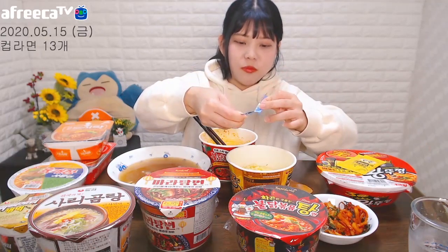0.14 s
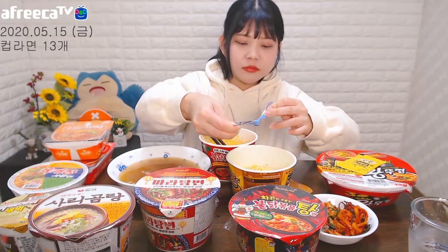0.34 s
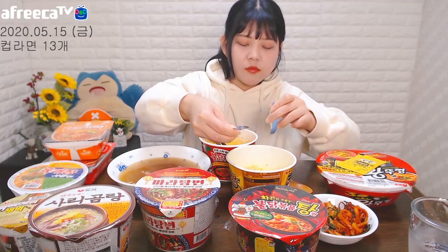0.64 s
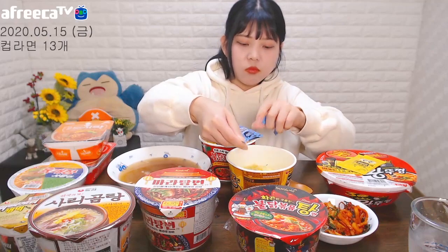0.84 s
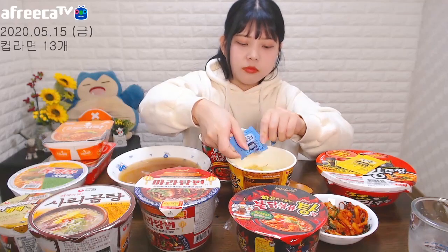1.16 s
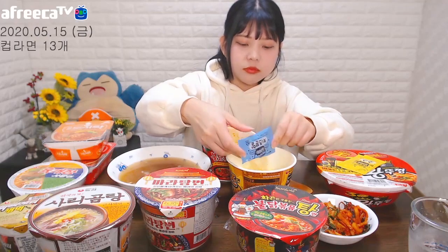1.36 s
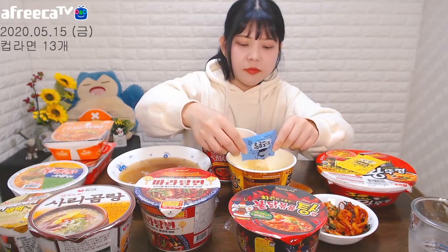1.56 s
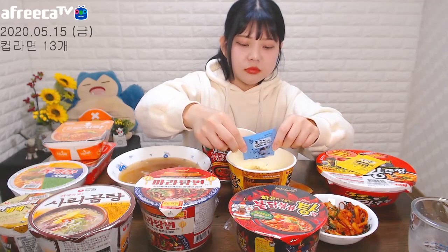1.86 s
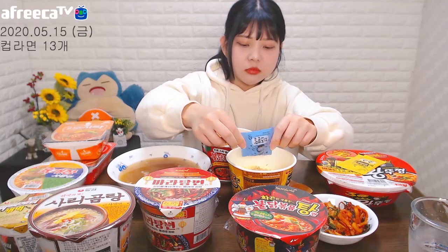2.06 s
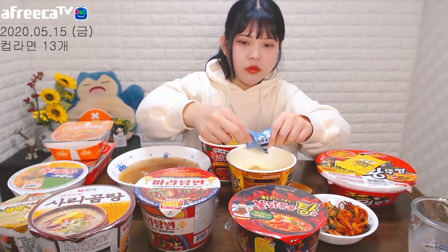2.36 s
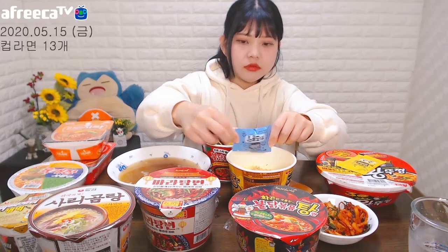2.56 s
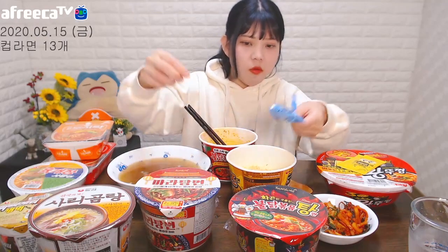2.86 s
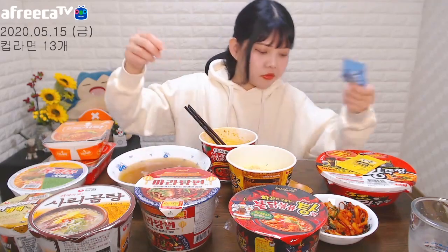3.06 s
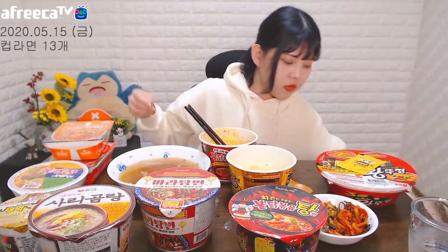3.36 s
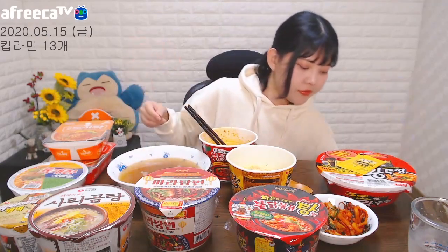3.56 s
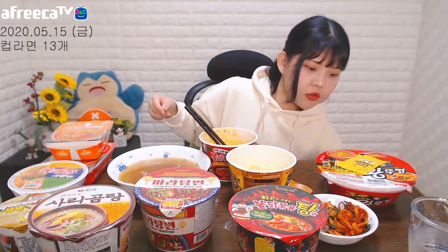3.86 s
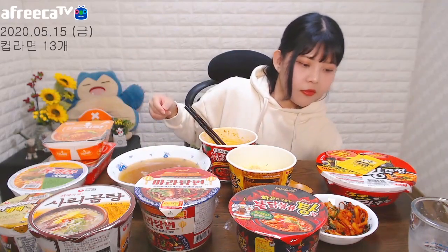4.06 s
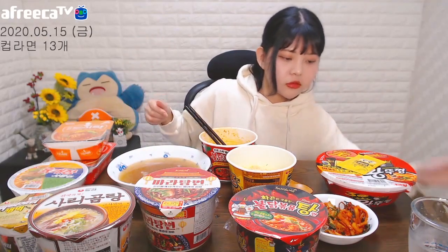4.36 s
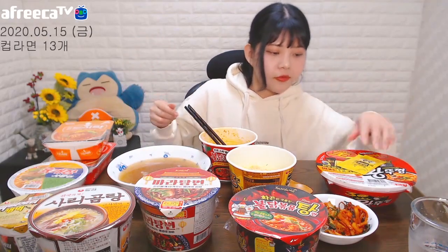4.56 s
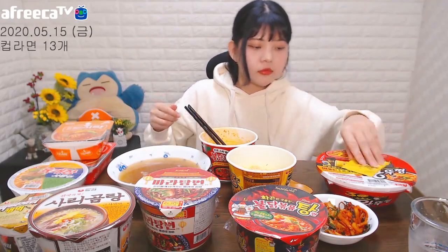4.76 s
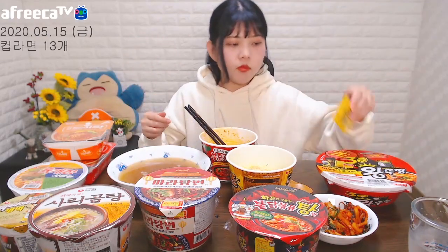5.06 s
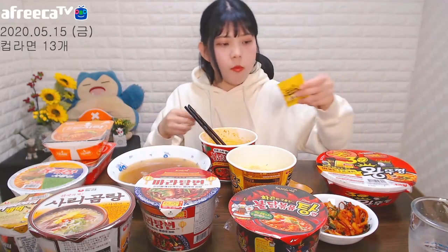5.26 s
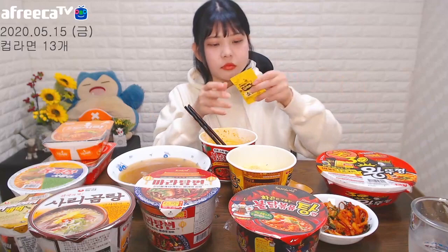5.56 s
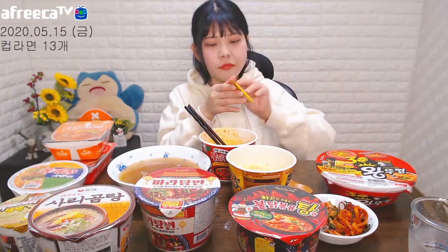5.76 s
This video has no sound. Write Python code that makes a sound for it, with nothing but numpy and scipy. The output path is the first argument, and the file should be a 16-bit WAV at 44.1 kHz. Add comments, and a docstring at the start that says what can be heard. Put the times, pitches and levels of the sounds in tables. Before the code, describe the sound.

Crisp thin film snaps and crackles near the microphone, with a slight hollow colour from an open cup and a short small-room tail. Sparse creases grow into a rapid loud flurry, then drop away. Afterwards come isolated light contacts, muffled table rumbles, near silence with very faint hum, and one small crinkle at the end.

```python
"""Thin plastic crackles and snaps: a sachet is pinched, crinkled and torn open over a paper cup at a table,
dropped aside, and another is picked off a lid. Creases are short damped rings over a dense crackle of grains.
The cup adds resonances, a small room answers with noise tails, the table rumbles in filtered noise,
and a mains hum and a late thin whine lie below. A close stereo microphone feeds a noise suppressor
that ducks the quiet moments."""
import sys
import numpy as np
from scipy import signal
from scipy.fft import rfft, irfft, next_fast_len
from scipy.io import wavfile
from scipy.ndimage import uniform_filter1d, map_coordinates

SR = 44100
rng = np.random.default_rng(int(sys.argv[2]) if len(sys.argv) > 2 else 0)


def unload_audio(sound):
    """Save the sound as a 16-bit wav file, at the path given as the first command line argument."""
    columns = np.transpose(np.atleast_2d(sound))
    # keep every value between -1 and 1, then stretch to whole-number steps
    steps = np.round(np.clip(columns, -1, 1) * 32767)
    wavfile.write(sys.argv[1], SR, steps.astype(np.int16))


def to_linear_factor(level_db):
    """Convert decibel levels (scalar or array-like) to linear amplitude factors."""
    exponent = np.asarray(level_db, float) / 20
    return 10 ** exponent


N = 260659

# Single creases and contacts. Each row: start in seconds, level in dB, ring pitch in Hz,
# thud trim in dB re level, sizzle trim in dB re level.
SNAPS = [(0.013, -53, 5640, -18, 6), (0.045, -45.5, 5230, -18, 2), (0.051, -48, 4300, -10, -0.5),
         (0.1135, -41, 6240, -5, -5.5), (0.1205, -54, 4370, -7, -4), (0.253, -34.5, 2020, -13.5, 1.5),
         (0.4555, -38.5, 2267, -8, 0), (0.5184, -44.5, 1496, -38, -31), (0.7193, -48.5, 1660, -22, 2.5),
         (0.9362, -46, 3300, -1, -15.5), (0.962, -39.5, 2220, 0.5, 0), (0.9868, -40, 5070, -19.5, -16.5),
         (1.011, -45, 4498, -24, -3.5), (1.034, -51, 2230, 2, 3), (1.097, -37.5, 2130, -6, -16.5),
         (1.225, -50.5, 1820, -6.5, -21), (1.3326, -48, 1600, -8.5, -19.5),
         (1.3743, -43.5, 2055, -19.5, -20), (1.4065, -42.5, 2150, -27, -9.5),
         (1.479, -45, 2540, -3.5, -4.5), (1.5089, -33, 2940, -9.5, -2.5), (1.519, -25.5, 2850, -19, -9.5),
         (1.5439, -35.5, 2740, -19, -30), (1.5752, -33, 2200, -2.5, -4.5), (1.6141, -41.5, 1848, 1, -30),
         (1.695, -41.5, 4400, -21, -3.5), (1.7016, -26, 2600, -7.5, -7.5), (1.7464, -42, 1800, -13.5, -3.5),
         (1.7629, -35, 1700, -8, -5), (1.776, -38, 1784, 1.5, -17), (1.8033, -34.5, 2330, -3, -0.5),
         (1.856, -25, 2200, -11.5, -20.5), (1.9034, -35.5, 2210, -9.5, -6),
         (1.9415, -35.5, 2140, -6.5, -10), (2.0314, -37, 2130, 0, -23), (2.051, -34.5, 2130, -7, -20.5),
         (2.083, -44, 2220, -13, -28.5), (2.1128, -33, 1870, -6, -14), (2.1207, -20.5, 1948, -14.5, -15),
         (2.145, -28.5, 2370, 0.5, -8), (2.1604, -27, 2400, -8.5, -6.5), (2.1662, -29.5, 3460, -13.5, -6.5),
         (2.2039, -31.5, 2181, -5.5, -16), (2.2258, -30.5, 2230, -13, -2.5),
         (2.2551, -19.5, 2295, -18.5, -4), (2.284, -25, 2130, -5, -5.5), (2.303, -35, 2320, -7, -3),
         (2.3092, -27, 4100, -17, -2.5), (2.3263, -24.5, 2116, -5, -4.5), (2.338, -35.5, 1520, 5.5, -17.5),
         (2.3428, -21.5, 2537, -8, -6), (2.3555, -27, 2180, -11, -4.5), (2.389, -35.5, 5699, -8, -6.5),
         (2.4045, -24.5, 2380, -8.5, -2.5), (2.4136, -33.5, 2170, -4.5, -2),
         (2.426, -22, 2770, -9.5, -10.5), (2.438, -20, 2217, -8.5, -1.5), (2.446, -26.5, 2290, -10, 0),
         (2.4723, -27, 2720, -8.5, -4.5), (2.4888, -30, 4810, -10, -3), (2.5022, -30.5, 2110, -4, -19),
         (2.5449, -34.5, 2884, -5, -14), (2.5817, -29.5, 1900, -23, -0.5), (2.607, -32, 4790, -21.5, -2),
         (2.745, -48.5, 1445, 3, -29), (2.7985, -44, 4116, -21, -49), (2.8092, -48, 1675, 3, -20),
         (3.0627, -34, 1837, -24.5, -33), (3.067, -33, 2198, -29.5, -25.5), (3.462, -40, 1594, -5, -31),
         (3.5026, -46, 2440, 1.5, -13), (3.7, -50, 1888, -8, -11), (3.71, -41, 1998, -22, -42),
         (3.899, -52.5, 1734, -9.5, -20), (4.6115, -45.5, 1430, 11, -20.5), (4.618, -49, 3450, -18, -21),
         (4.7195, -51, 1611, 10.5, -27.5), (4.741, -47.5, 1535, 6.5, -17), (4.7605, -56, 1570, 13, -22),
         (4.762, -46.5, 4075, -9, -17), (4.81, -56.5, 2320, 2, -30), (4.9569, -57.5, 2294, 4.5, -5),
         (5.0966, -57.5, 3220, -26, -25), (5.0937, -57.5, 5870, -16.5, -8.5), (5.1567, -63, 2033, 7, -29),
         (5.691, -65, 3760, 18, -23), (5.769, -60, 2200, -24, -10), (5.8108, -37.5, 2198, 2.5, -6.5)]
# Spectrum of the sizzle. Each row: frequency in Hz, relative density in dB per Hz.
SIZZLE = [(2500, -29.5), (3700, -6), (4700, 0), (6300, -2), (9000, -12)]
# Where the hands are. Each row: time in seconds, left over right in dB.
HANDS = [(0, 1), (1.4, -2), (2.3, -2), (3.1, -3.5), (3.5, 0), (4.3, 2), (4.7, -3), (5.91, -0.5)]
CRACK_DB = -13  # re snap level, over the cup


def snaps():
    """Each crease rings briefly at its own pitch, with a crack, a thud and a sizzle; softer, longer off the cup."""
    out, sizzle = np.zeros((2, 2, N + SR // 10))
    t = np.arange(SR // 14) / SR
    (fold_hz,), (pan_db,), away = curves(FOLD_PITCH), curves(HANDS), 1 - over_cup()
    for start_s, db, hz, thud_db, sizzle_db in SNAPS:
        start = round(start_s * SR)
        span = slice(start, start + len(t))
        noise, *side_noise = rng.standard_normal((3, len(t)))
        ring_detune, thud_detune = rng.normal(1, [[[.08]], [[.17]]], size=(2, 5, 1))
        chime_hz, chime_turn = rng.uniform(3300, 7300, (4, 1)), rng.random((4, 1))
        chimes = 0.23 * np.sin(2 * np.pi * (chime_hz * t + chime_turn)).sum(axis=0)
        pan = pan_db[start] + 1.4 * rng.standard_normal()
        sides = to_linear_factor(db + np.array([[.5], [-.5]]) * pan)
        blur = 1 + 7.2 * away[start]

        def fade(rise_s, t60_s):
            return (1 - np.exp(-t / (rise_s * blur ** 1.2))) * to_linear_factor(-60 * t / (t60_s * blur))

        ring = np.sin(2 * np.pi * hz * t) + 0.59 * np.sin(2 * np.pi * hz * ring_detune * t).sum(axis=0)
        thud = np.sin(2 * np.pi * fold_hz[start] * thud_detune * t).sum(axis=0)
        crack = noise[::-1] - np.roll(noise[::-1], shift=5)
        hiss = 0.81 * noise + 0.23 * np.array(side_noise) + chimes
        out[:, span] += sides * to_linear_factor(-10.0) * ring * fade(0.00022, 0.011)
        out[:, span] += sides * to_linear_factor(thud_db - 10.5) * thud * fade(0.0003, 0.021)
        out[:, span] += sides * to_linear_factor(CRACK_DB) / blur ** 0.5 * crack * fade(.0001, 0.0018)
        sizzle[:, span] += sides * to_linear_factor(sizzle_db - 3.5) * hiss * fade(0.00062, 0.011)
    return out[:, :N] + filtered(sizzle[:, :N], causal(SIZZLE))


# Pitch of the larger folds. Each row: time in seconds, pitch in Hz.
FOLD_PITCH = [(0, 793.5), (.11, 540.3), (.25, 776), (.5, 864), (.97, 985), (1.5, 813), (1.64, 850),
              (1.71, 509.7), (1.79, 932), (1.95, 859.5), (2.04, 526), (2.12, 732), (2.26, 886), (2.56, 767),
              (2.83, 1167), (3.47, 1134), (3.53, 900), (3.7, 1189), (4.0, 999), (4.4, 1047), (4.55, 660),
              (4.75, 541.4), (5.45, 465.4), (5.91, 516.5)]
DULLER_ASIDE, DEEPER_ASIDE = .15, .2  # shares by which sizzle and crackle sink in pitch away from the cup


def crackle():
    """The worked film crackles; big folds flex low down, fine creases sizzle."""
    gain, sizzle_gain, fold_gain = grips()
    fold_hz, = curves(FOLD_PITCH)
    away = 1 - over_cup()
    crease_hz = 2500 * (1 - DEEPER_ASIDE * away)
    fine_hz = 5200 * (1 - DULLER_ASIDE * away)
    folds = grains(420, fold_hz, scatter=0.3, cycles=2.92, spread_db=3.5, clump=.5, width_db=1.5)
    creases = grains(1000, crease_hz, scatter=.34, cycles=3.6, spread_db=3.5, clump=.45, width_db=3.5)
    fine = grains(1600, fine_hz, scatter=.25, cycles=5.5, spread_db=4.0, clump=0.5, width_db=2.0)
    flurry = stirred()
    treble = gain * creases + sizzle_gain * fine
    return to_linear_factor(-5.0) * (fold_gain * folds * np.sqrt(flurry) + treble * flurry)


# The seal rips and grains pack closer. Each row: time in seconds, extra grains per grain.
TEAR = [(2.05, 0), (2.15, .6), (2.6, .6), (2.7, 0)]
DENSER_ASIDE = 1.6  # extra grains per grain: away from the cup the film rubs rather than cracks
GRAIN_LAG_PER_SIDE_S = 2e-5  # scatter; grains lie apart on the film
COLOUR_SHIFTS = .14  # pitch wander in log units as the film changes shape


def grains(rate, pitch_hz, scatter, cycles, spread_db, clump, width_db):
    """Small buckles at clumped random moments, each a few damped cycles at its own pitch; rms 1."""
    dense = 1 + DENSER_ASIDE * (1 - over_cup()) + np.abs(curves(TEAR)[0])
    starts = np.flatnonzero(rng.random(N) < dense * rate / SR * np.exp(clump * wobble(45)))
    pitch_hz = pitch_hz * np.exp(COLOUR_SHIFTS * wobble(14))
    chance = rng.standard_normal((len(starts), 4))
    hz = np.clip(pitch_hz[starts] * np.exp(scatter * chance[:, 0]), 150, 9000)[:, None]
    length = int(16 * SR / np.mean(pitch_hz))
    turns = hz * np.arange(length) / SR
    rows = np.sin(2 * np.pi * turns) * turns * np.exp(-turns / cycles)
    rows = rows * to_linear_factor(spread_db * chance[:, 1:2]) * np.sqrt(hz / dense[starts, None])
    lag = np.round(GRAIN_LAG_PER_SIDE_S * SR * chance[:, 3]).astype(int)

    def side(sign):
        at = np.maximum(starts + sign * lag, 0)[:, None] + np.arange(length)
        panned = rows * to_linear_factor(sign * width_db * chance[:, 2:3])
        return np.bincount(at.ravel(), panned.ravel(), N + SR)[:N]

    return unit(np.array([side(1), side(-1)]))


def stirred():
    """Every snap sets off a flurry of crackle that starts at once and settles."""
    kicks = np.zeros(N)
    kicks[np.round(np.transpose(SNAPS)[0] * SR).astype(int)] = 1
    decay = np.exp(-np.arange(SR // 8) / SR / 0.013)
    flurry = signal.fftconvolve(kicks, decay)[:N]
    return 0.75 + 0.85 * np.minimum(flurry, 1.3)


# Each pinch, pull or touch starts a burst of crackle that dies away. Each row: start in seconds,
# crackle in dB, sizzle in dB, folds in dB (all before trims), crackle t60 in seconds.
GRIPS = [(0.004, -55, -54.5, -56.5, 1.7), (0.116, -55, -47.5, -52, 0.14), (0.248, -49.5, -42.5, -58, 0.4),
         (0.45, -54.5, -54.5, -50.5, 0.34), (0.694, -63, -66, -64.5, 0.33), (0.816, -64, -66, -70, 0.32),
         (0.891, -53.5, -66.5, -70, 0.51), (0.956, -49, -47.5, -49, 0.32), (1.031, -52.5, -65, -56, 0.19),
         (1.094, -53.5, -63.5, -63.5, 0.48), (1.22, -56, -59.5, -59, 0.47), (1.318, -57, -61.5, -60.5, 3.5),
         (1.505, -43.5, -41.5, -42.5, .3), (1.571, -53, -48, -46.5, 0.21), (1.698, -44, -46, -46.5, 0.38),
         (1.761, -51, -57, -56, 0.17), (1.852, -40.5, -39, -46.5, 0.2), (1.918, -40, -51, -36.5, 0.17),
         (2.029, -43.5, -48, -42, 0.29), (2.115, -39, -37.5, -37, 0.76), (2.142, -40.5, -43.5, -46, 0.34),
         (2.203, -47.5, -42.5, -45.5, 0.26), (2.255, -41.5, -47, -44.5, 0.68),
         (2.304, -40, -38.5, -39, 0.86), (2.342, -43, -35, -46, 0.14), (2.403, -40.5, -39, -41, 0.21),
         (2.432, -41.5, -33, -44.5, 0.34), (2.47, -42.5, -40.5, -44, .3), (2.503, -40, -51, -43, 0.17),
         (2.545, -41.5, -50, -43.5, .25), (2.579, -38.5, -48, -37.5, 0.11), (2.605, -49, -50, -86.5, 0.083),
         (2.745, -59.5, -78.5, -54, 0.08), (2.801, -61, -77, -61, 0.32), (3.05, -52, -61.5, -56, 0.35),
         (3.19, -86.5, -100, -68, 0.47), (3.289, -81, -100, -69, 0.2), (3.411, -87.5, -105, -72.5, 0.11),
         (3.459, -50, -60, -62, 0.45), (3.501, -54, -54, -60, 0.34), (3.566, -65, -54, -66, 0.31),
         (3.692, -65, -62, -65.5, 0.98), (3.789, -58.5, -63.5, -80, 0.14), (3.893, -56, -65, -53.5, 0.68),
         (3.963, -53, -59, -46, 0.39), (4.17, -60.5, -70, -69, 0.34), (4.346, -68, -79, -66.5, 0.42),
         (4.609, -60, -55, -45, 0.42), (4.639, -49, -54, -44, 0.15), (4.719, -64, -73, -49.5, 0.58),
         (4.759, -62.5, -79, -56, 0.62), (4.81, -62.5, -75, -59.5, 0.73), (4.99, -59, -75, -61.5, 0.42),
         (4.93, -57.5, -60.5, -55.5, 0.41), (5.097, -71, -73, -68.5, 0.32), (5.148, -62, -97.5, -82, 0.22),
         (5.455, -85, -105, -58.5, 0.28), (5.611, -85, -100, -56.5, 0.53),
         (5.643, -88.5, -100, -49.5, 0.13), (5.511, -67.5, -95, -66, 0.071), (5.57, -76.5, -87, -87, 0.16),
         (5.69, -71.5, -75.5, -67.5, 0.24), (5.788, -64, -66.5, -86, 0.64), (5.807, -56, -64, -55.5, 0.48)]
GRIP_RISE_S = 0.004
SIZZLE_LASTS, FOLDS_LAST = 0.68, 1.164  # t60 over that of the crackle


def grips():
    """Gains of crackle, sizzle and folds: one swell and decay per grip."""
    s, db, sizzle_db, fold_db, t60_s = np.transpose(GRIPS)
    layers = ((db, 1), (sizzle_db, SIZZLE_LASTS), (fold_db, FOLDS_LAST))
    return [bursts(s, level_db, GRIP_RISE_S, t60_s * lasts) for level_db, lasts in layers]


def bursts(times_s, levels_db, rise_s, t60s):
    """Gain of overlapping bursts: each swells in around its moment, then decays; powers add."""
    knots_s = np.arange(0, N + 64, 64) / SR
    since_s = knots_s - np.asarray(times_s)[:, None]
    swell = .5 + .5 * np.tanh(since_s / rise_s)
    decay_db = 60 * np.maximum(since_s, 0) / np.clip(t60s, .05, 5)[..., None]
    shape = swell * to_linear_factor(np.asarray(levels_db)[:, None] - decay_db)
    return np.interp(np.arange(N) / SR, knots_s, np.sqrt(np.sum(shape ** 2, axis=0)))


# Hands over the cup. Each row: time in seconds, closeness to the cup from 0 to 1.
OVER_CUP = [(0, 0.87), (.9, 0.77), (1.2, 0.91), (2.7, 0.86), (3, 0.32), (3.4, 0.06), (5.3, 0), (5.6, 0.64),
            (5.91, 0.53)]


def over_cup():
    """Closeness of the hands to the cup, 0-1 per sample."""
    return np.clip(curves(OVER_CUP)[0], 0, 1)


# Air in and over the cup. Each row: resonance in Hz, width in Hz, level in dB before a common lift.
CUP = [(512, 47, -4), (938, 45, 8.5), (2130, 80, -11.5), (2575, 48, -11.5), (4540, 260, -12)]
# Hollow space beside the table. Each row: resonance in Hz, width in Hz, level in dB.
ASIDE = [(1196, 140, 5)]


def cup(x):
    """The open cup adds its resonances while the hands are over it; aside, another hollow rings instead."""
    def modes(rows):
        def response(f):
            total = 0
            for k, (hz, width, db) in enumerate(rows):
                band = 1j * f * width / (hz * hz - f * f + 1j * f * width)
                total = total + (-1) ** k * to_linear_factor(db) * band  # neighbours alternate in sign
            return total
        return response

    near = over_cup()
    aside = filtered(x * (1 - near), modes(ASIDE))
    return x + to_linear_factor(4.5) * filtered(x * near, modes(CUP)) + aside


# Decay of the room. Each row: frequency in Hz, t60 in seconds.
ROOM = [(200, 0.67), (600, 0.3), (1500, 0.3), (4000, 0.13), (9000, 0.31)]


def room(x):
    """Walls answer with noise tails that decay by frequency; the hands move, so the tail changes every .3 s."""
    out, step, delay = np.zeros((2, N + 2 * SR)), int(.3 * SR), 130  # samples
    for start in range(0, N, step):
        hz, t, z = signal.stft(rng.standard_normal((2, SR // 2)), SR, nperseg=128)
        decay = to_linear_factor(-60 * t / along(ROOM, hz)[:, None])
        tail = signal.istft(z * decay, SR, nperseg=128)[1]
        tail = tail / np.linalg.norm(tail[0])
        wet = signal.fftconvolve(x[None, start:start + step], tail, axes=1)
        out[:, start + delay:start + delay + wet.shape[1]] += wet
    return out[:, :N]


# Arms and chair bump the table. Each row: start in seconds, shake in dB, boom in dB, drone in dB.
BUMPS = [(0, -58, -64, -72), (.16, -66, -63.5, -69.5), (.36, -72, -74, -84), (0.677, -65.5, -68, -79),
         (0.883, -63, -68.5, -87), (1.09, -64.5, -80, -94), (1.21, -60, -71.5, -68),
         (1.42, -67.5, -73.5, -88), (1.6, -63, -65.5, -85), (1.66, -80, -65, -83), (1.72, -73, -54.5, -83),
         (1.785, -70, -65, -70), (1.85, -56.5, -63.5, -63), (1.915, -74, -57.5, -55),
         (1.979, -70, -59.5, -73), (2.141, -56, -56, -62), (2.3, -65, -51.5, -52), (2.5, -65.5, -52.5, -58),
         (2.759, -62.5, -71.5, -67.5), (2.86, -64, -75.5, -65.5), (3.06, -64.5, -74, -65),
         (3.25, -77, -79.5, -72.5), (3.44, -70.5, -72, -65), (3.55, -60, -73.5, -95),
         (3.711, -64, -73.5, -64.5), (3.939, -74, -74, -52.5), (4.059, -60, -71.5, -64),
         (4.2, -73, -78, -68), (4.329, -56, -73, -67.5), (4.401, -53, -62.5, -85.5),
         (4.488, -64.5, -68.5, -75), (4.601, -57, -50, -51), (4.76, -52.5, -54.5, -76),
         (4.961, -64.5, -70.5, -72), (5.1, -58.5, -67, -66.5), (5.37, -60.5, -80, -90),
         (5.65, -61, -66, -74), (5.82, -65, -86, -81)]
# Spectra of shake, boom and drone. Each row: frequency in Hz, relative density in dB per Hz.
SHAKE = [(15, -18), (40, -13), (58, 2), (85, -12.5), (150, -44.5)]
BOOM = [(70, -38.5), (110, -2), (160, 0), (210, -8.5), (350, -36.5)]
DRONE = [(150, -32.5), (240, 1), (295, -3), (370, -7.5), (550, -35)]
# Leaning on the table sways the microphone. Each row: time in seconds, level in dB.
SWAY = [(4.3, -90), (4.36, -56), (4.5, -53.5), (4.65, -59.5), (4.9, -65), (5.2, -80.5)]
SWAY_HZ = 17  # centre of a wandering pitch
BUMP_RISE_S, BUMP_T60_S = 0.013, 0.4
TABLE_HEARS_DB = -17.5  # drone that the folding film stirs, re fold gain; boom 6 dB less
TABLE_HZ, TABLE_RINGS = 57.8, 0.18  # centre of the lowest mode, and its share of the shake


def table():
    """Arms and chair shake the table under the microphone, in lumps; its top booms and drones."""
    s, *levels_db = np.transpose(BUMPS)
    shake, boom, drone = (bursts(s + BUMP_RISE_S, db, BUMP_RISE_S, np.array(BUMP_T60_S)) for db in levels_db)
    stir = to_linear_factor(TABLE_HEARS_DB) * uniform_filter1d(grips()[2], size=1500)
    mode = unit(np.sin(2 * np.pi * np.cumsum(TABLE_HZ + 5 * wobble(2.6)) / SR))
    shaking = TABLE_RINGS * mode + np.sqrt(1 - TABLE_RINGS ** 2) * pair(SHAKE, .72)
    shake = shake * to_linear_factor([[-.9], [.9]]) * shaking
    boom = np.hypot(boom, to_linear_factor(-6) * stir) * to_linear_factor(2.5 * wobble(14)) * pair(BOOM, .84)
    drone = np.hypot(drone, stir) * to_linear_factor(2.8 * wobble(24)) * pair(DRONE, .8)
    sway_gain = to_linear_factor(curves(SWAY)[0] + 2.7 * wobble(12))
    sway = sway_gain * np.sin(2 * np.pi * np.cumsum(SWAY_HZ + 4 * wobble(4.2)) / SR)
    return sway + shake + boom + drone


# Spectrum of the room tone. Each row: frequency in Hz, relative density in dB per Hz.
AIR = [(80, -14), (300, -1.5), (700, -8), (1300, -14.5), (2500, -28), (7000, -32.5)]
# A faint thin whine. Each row: time in seconds, level in dB.
WHINE = [(0, -100), (5.05, -100), (5.15, -80.5), (5.35, -92.5), (5.47, -84.5), (5.91, -79.5)]
# Narrow hiss around the whine. Each row: frequency in Hz, relative density in dB per Hz.
FUZZ = [(1050, -32), (1250, -3), (1450, -1), (1600, -34)]


def background():
    """Noise room tone with a wavering mains hum and a thin whine, fuzzy with narrow hiss."""
    t = np.arange(N) / SR
    hum = to_linear_factor(-84 + 5 * wobble(6)) * np.sin(2 * np.pi * 59.5 * t)
    tone = np.sin(2 * np.pi * 1285 * t + .5 * wobble(40))
    whine = to_linear_factor(curves(WHINE)[0] + 2.5 * wobble(20)) * (tone + .8 * pair(FUZZ, .6))
    drift_db = -84 + 2.5 * wobble(5)
    return hum + whine + to_linear_factor(drift_db) * pair(AIR, 0.48)


def pair(colour, alike):
    """Stereo noise of rms 1, partly shared by both ports."""
    mid, side = filtered(rng.standard_normal((2, N)), causal(colour))
    side = (1 - alike) * side
    return unit(np.array([mid + side, mid - side]))


def unit(x):
    """Scaled to rms 1."""
    return x / np.sqrt(np.mean(x ** 2) + 1e-20)


def curves(rows):
    """One value per sample for each column after the time."""
    s, *cols = np.transpose(rows)
    return [np.interp(np.arange(N) / SR, s, c) for c in cols]


def along(points, hz):
    """(Hz, value) points on a log axis."""
    f, v = np.transpose(points)
    return np.interp(np.log(hz + 1), np.log(f + 1), v)


def wobble(rate):
    """A smooth random curve, rate knots a second."""
    return map_coordinates(rng.standard_normal(int(N * rate / SR) + 4), [np.arange(N) * rate / SR])


def filtered(x, response):
    """x times a complex response of frequency."""
    m = 2 * next_fast_len(N // 2 + SR // 4)
    return irfft(rfft(x, m) * response(np.fft.rfftfreq(m, 1 / SR)), m)[..., :N]


def causal(spectrum):
    """The colour as a response that never sounds before its cause (minimum phase), with unit power."""
    def response(hz):
        outside = (hz < spectrum[0][0] / 2) | (hz > 2 * spectrum[-1][0])
        db = along(spectrum, hz) - 40 * outside
        cepstrum = irfft(np.log(to_linear_factor(db)))
        cepstrum[1:len(hz) - 1] *= 2
        cepstrum[len(hz):] = 0
        gain = np.exp(rfft(cepstrum))
        return gain / np.sqrt(np.mean(np.abs(gain) ** 2))
    return response


# Where the film is. Each row: time in seconds, left over right in dB.
CRACKLE_PAN = [(0, -2.5), (1, -5.1), (1.7, 0), (3.2, -4.5), (4.3, -6.5), (4.7, -3.5), (5.91, -2.5)]
# Phase between the ports. Each row: frequency in Hz, lead of the left port in radians.
LEAD = [(100, 1), (900, -0.88), (1460, -1.8), (2500, -0.43), (4400, -0.5), (6000, -0.88)]


def scene():
    """The sachet reaches the two ports slightly apart in phase; room, table and background add."""
    film = crackle() * to_linear_factor(curves(CRACKLE_PAN)[0] * [[.5], [-.5]])
    near = cup(snaps() + film)
    ports = filtered(near, lambda hz: np.exp(.5j * along(LEAD, hz) * np.array([[1], [-1]])))
    wet = room(near.mean(axis=0))
    # close ports agree in the bass
    bass_shared = filtered(wet[0] - wet[1], lambda hz: .5 / (1 + (hz / 1150) ** 4))
    wet = wet - bass_shared * [[1], [-1]]
    return ports + to_linear_factor(-3.5) * wet + table() + background()


def low_pass(x):
    """Removes everything above the highest recorded frequency."""
    return signal.sosfilt(signal.butter(12, 10110, fs=SR, output="sos"), x)


# Treble limit: highs fall steeply above about 7 kHz. Each row: frequency in Hz, gain in dB.
TREBLE_LIMIT = [(20, 1.5), (6700, 0.5), (7600, -6.5), (8600, -14), (9400, -14.5), (10100, -40)]


def record(dry):
    """The treble is limited; a suppressor turns down bands that sink towards the noise it expects, by 3.5 dB at most."""
    limited = filtered(dry, lambda f: to_linear_factor(along(TREBLE_LIMIT, f)))
    hz, _, z = signal.stft(limited, SR, nperseg=1024)
    power = uniform_filter1d(np.mean(np.abs(z) ** 2, axis=0), size=3, axis=0)
    noise_db = -98 - 3 * np.log2(hz / 1000 + 0.1)
    gain = np.clip(1 - to_linear_factor(2 * noise_db)[:, None] / (power + 1e-20), to_linear_factor(-3.5), 1)
    quiet = signal.istft(z * gain, SR, nperseg=1024)[1][:, :N]
    return low_pass(quiet)


dry = scene()
out = record(dry)
unload_audio(out)
```